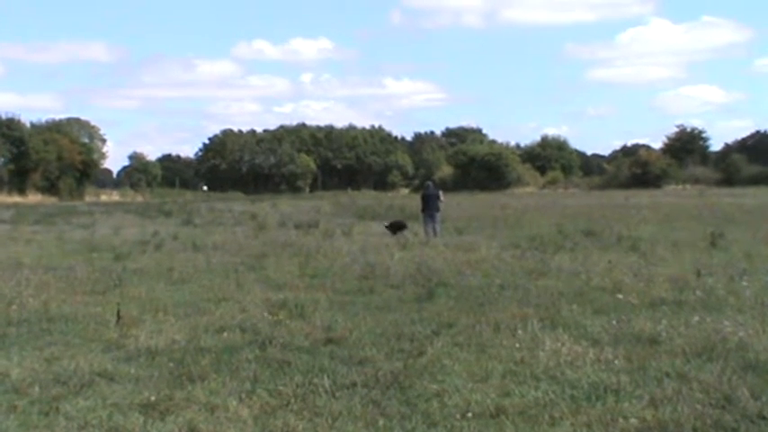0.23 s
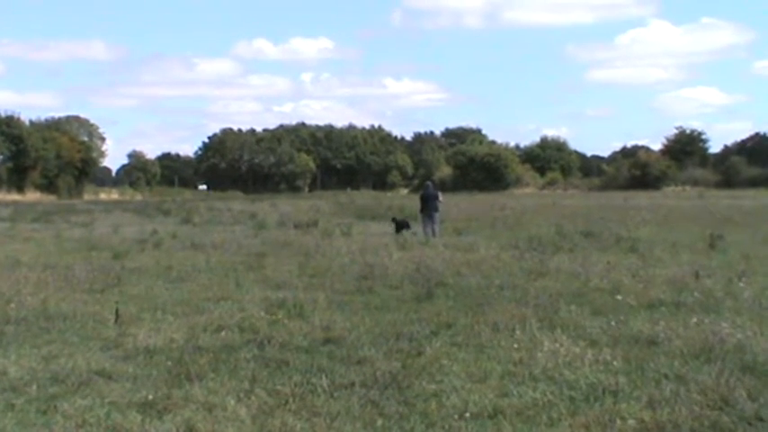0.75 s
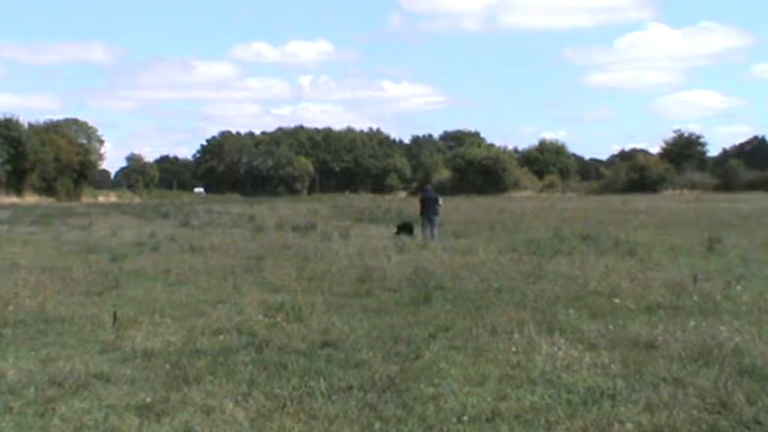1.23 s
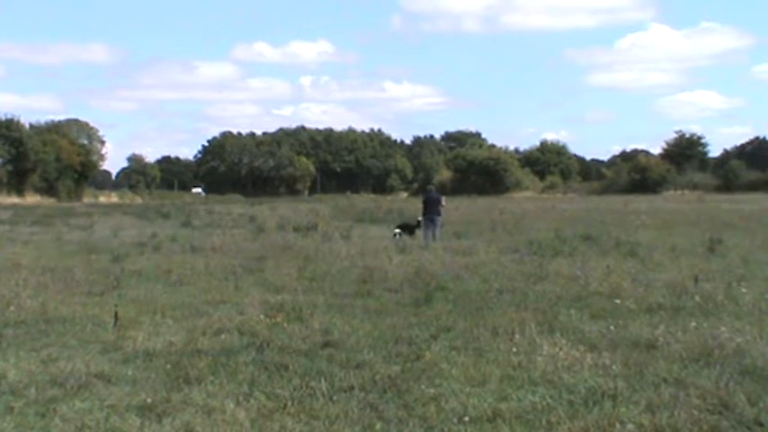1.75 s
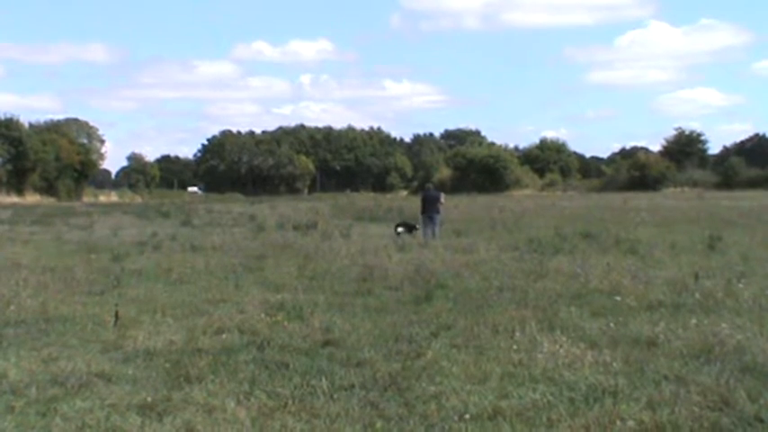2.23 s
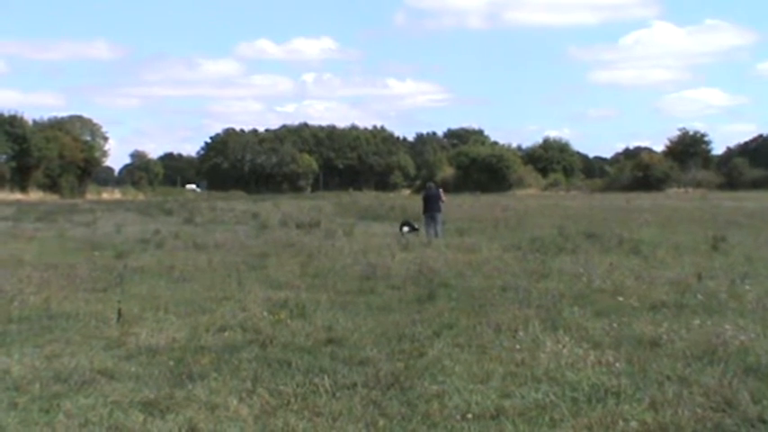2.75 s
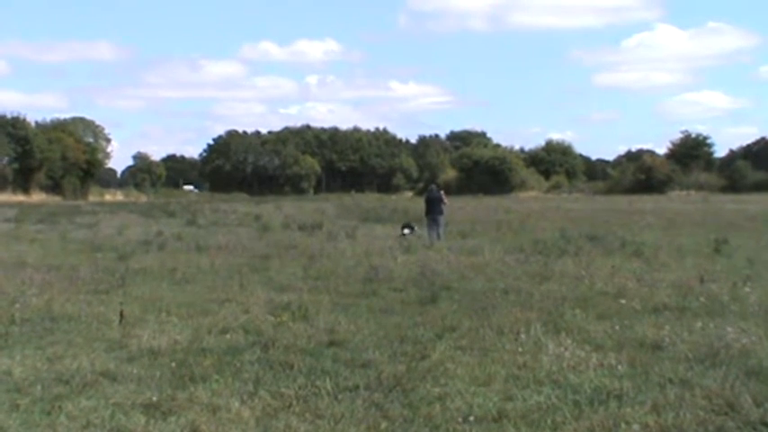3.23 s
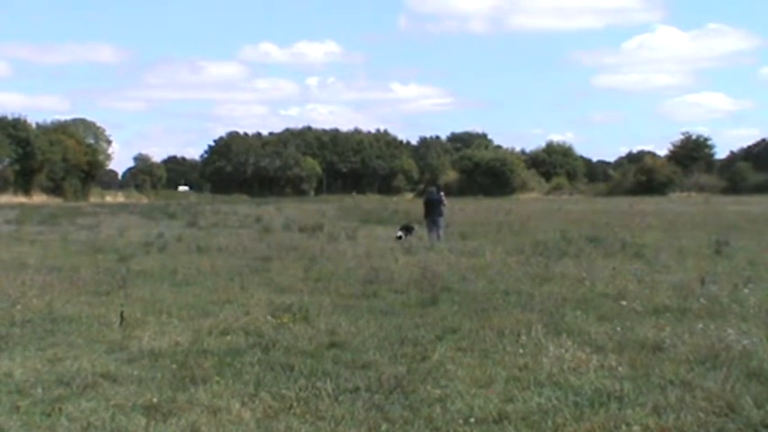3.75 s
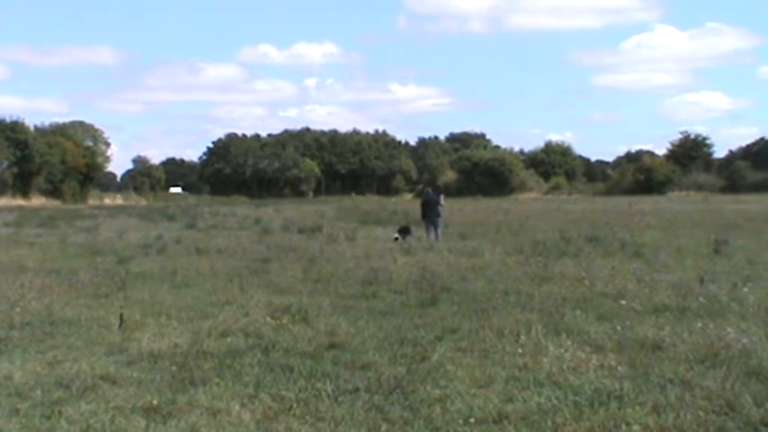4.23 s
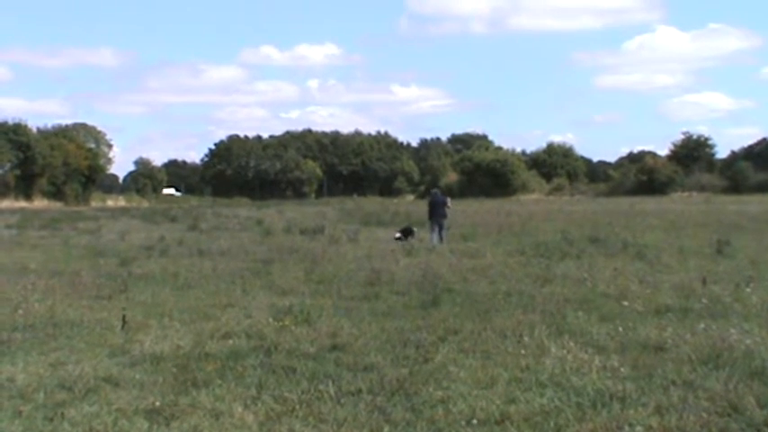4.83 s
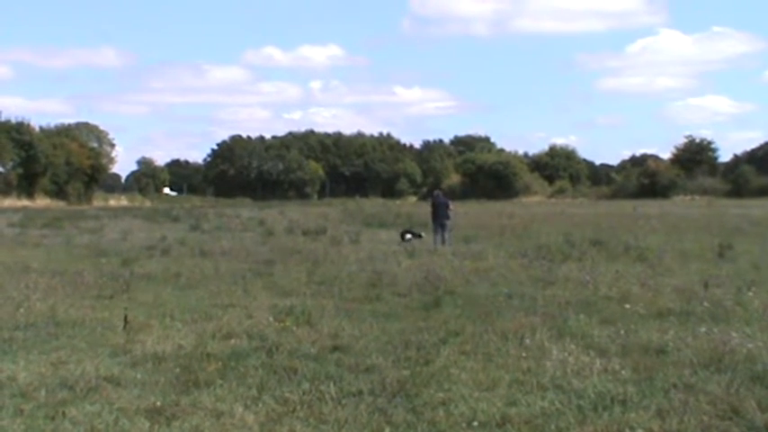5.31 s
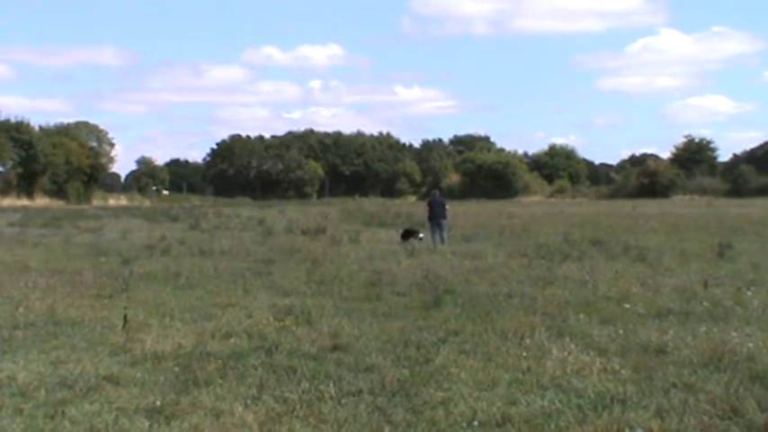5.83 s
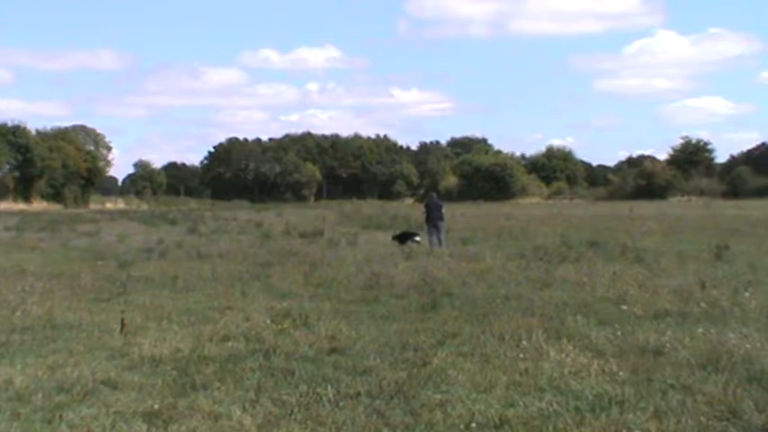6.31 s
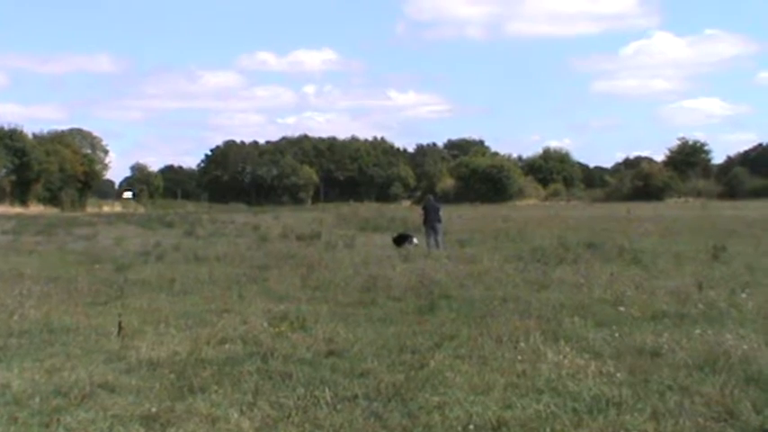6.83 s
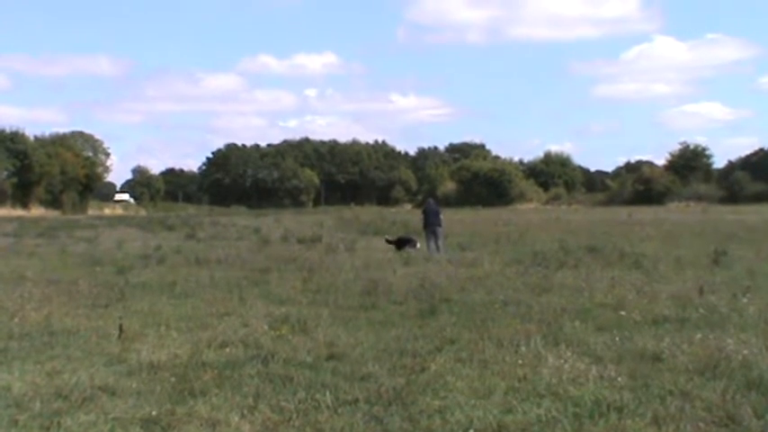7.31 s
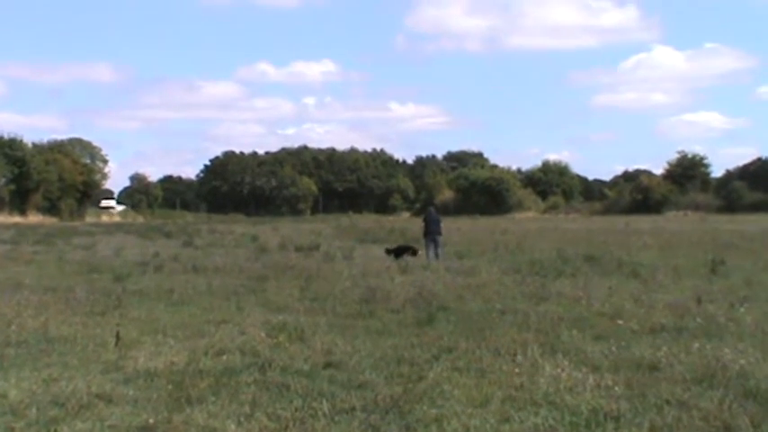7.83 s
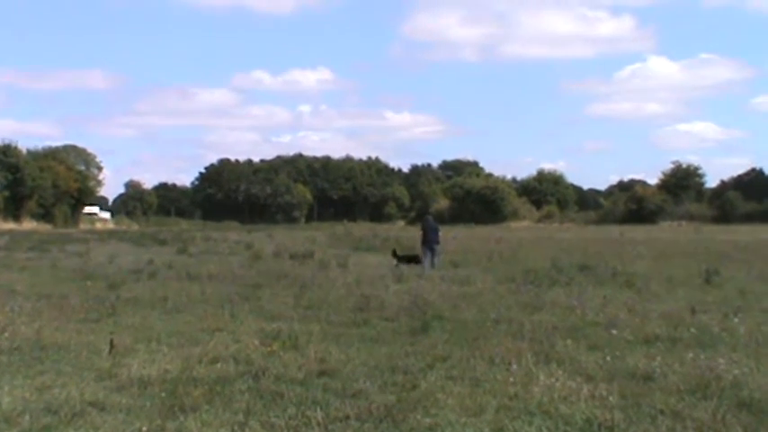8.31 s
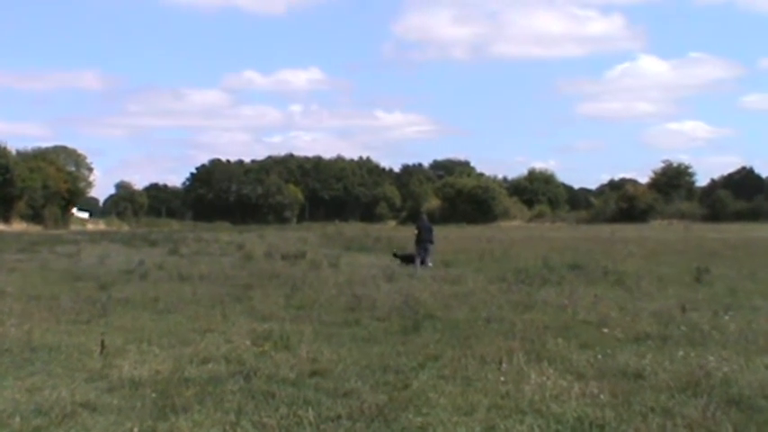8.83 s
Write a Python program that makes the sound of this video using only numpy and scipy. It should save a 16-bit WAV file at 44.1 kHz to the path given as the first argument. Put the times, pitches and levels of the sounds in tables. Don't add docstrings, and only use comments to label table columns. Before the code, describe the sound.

An open meadow heard through an exposed stereo camera microphone. From 0 to about 3.5 s, gusts buffet it: low lumpy rumble with irregular thumps around 100-300 Hz, each touching the left side slightly before the right. Blows thicken from 1 to 1.5 s, peak hard near 2.0-2.2 s with sharper snaps, ease, then one heavy thud comes at 3.2 s. After 4 s only faint puffs remain, with a single distinct bump at 6.2 s. Throughout, a soft far road roar and a fine, shimmering high insect hiss continue, with a barely audible very high electronic whine. From 4.6 to 6.7 s a close grasshopper rasps about seventeen dry ticks per second, swelling; it pauses, then resumes from 7.8 s, growing stronger until the end at 9 s. A very faint, brief distant engine hum passes near 5.8-6.1 s.

```python
import sys
import numpy as np
from scipy import signal
from scipy.io import wavfile
from scipy.ndimage import uniform_filter1d

SR = 44100
rng = np.random.default_rng(int(sys.argv[2]) if len(sys.argv) > 2 else 0)


def transcribe(signal):
    frames = np.atleast_2d(signal).T
    limited = np.clip(frames, -1, 1)
    pcm = np.round(limited * 32767).astype(np.int16)
    wavfile.write(sys.argv[1], SR, pcm)


def ratio_of_db(decibels):
    return 10 ** (np.asarray(decibels, float) / 20)


N = 399546

# (frequency [Hz], level [dB])
LINE_WHINE = [
    (15525, -82),
    (15575, -78),
    (15625, -73),
    (15675, -78),
]
# (start [s], end [s], pitch [Hz], level [dB])
ENGINE_NOTES = [
    (5.757, 5.955, 299.5, -63.5),
    (5.999, 6.124, 289, -60.5),
]

# (time [s], level [dB])
ROAD_LEVEL = [(0, -52.5), (.4, -52.5), (1.05, -49.5), (1.74, -49), (2.44, -52), (3.48, -49.5),
              (4.18, -50.5), (4.88, -51.5), (5.58, -56), (6.27, -52.5), (6.97, -54), (7.67, -54.5),
              (8.71, -52.5), (9.06, -53)]
# (frequency [Hz], density [dB per Hz])
TYRE_COLOUR = [(200, -17), (455, -14), (540, -12), (620, -3), (800, -0.5), (960, -8.5), (1100, -0.5),
               (1280, -3), (1500, -9), (2330, -10.5), (2600, -17.5), (3000, -18), (3500, -25.5),
               (6000, -29)]
# (time [s], spread [s], lorry band [dB], tyre brightness [dB])
VEHICLES = [(0.12, .4, 4, -2.5), (.95, 0.7, -3, -2.5), (1.62, 0.23, -0.5, 4), (2.75, 0.49, 8, 1.8),
            (4.5, 0.39, 5, 1.7), (5.65, 0.37, 0.5, 4), (6.4, 0.34, 1.5, -1), (6.95, 0.5, 4.5, 0.3),
            (8, 0.22, -1.5, 1.5), (8.45, 0.24, 1.5, 0.5), (9.06, 0.14, -2, -3)]
# (time [s], stretch [ratio])
ECHO_STRETCH = [(0, 1.02), (1, 1), (2, 0.99), (3, 1), (3.8, 0.99), (4.5, 0.98), (5.2, 0.98), (5.8, 0.94),
                (6.3, 1.04), (6.9, 1), (7.6, 1.014), (8.3, 1.01), (9.06, 1.02)]
# (frequency [Hz], density [dB per Hz])
WASH_COLOUR = [(150, 3.5), (300, 0.5), (450, 1), (700, -4), (1200, -6), (1800, -10), (2600, -17),
               (4000, -23.5)]
WASH_DB, STREAK_DB = -56.5, 1.2

# (frequency [Hz], left-right likeness [0-1])
AIR_LIKENESS = [(200, 1), (450, 0.12), (700, 1), (1200, 0.87), (2000, 0.76), (4500, 0.31), (8000, 0.33),
                (13000, 0.76)]
# (frequency [Hz], left port leads by [rad])
AIR_PHASE = [(0, -0.081), (1030, 0.73), (5250, -0.047), (6630, 0.64), (9820, -0.33), (10900, -0.0),
             (12600, -0.1), (16500, 0.0)]
# (frequency [Hz], left minus right [dB])
PORT_BALANCE = [(60, -2), (130, 4), (290, 0), (640, 0), (1410, 0.5), (3100, 0), (6820, -1), (15000, -1.5)]

# (time [s], level [dB], share of lower voices [dB])
CHORUS_LEVEL = [(0, -59.5, -3), (.8, -56.5, -6), (1.95, -57.5, -5), (2.9, -57.5, -1.5), (4.3, -59, -4),
                (5.0, -58.5, -4), (5.9, -58.5, -3), (6.6, -57, -3), (7.0, -59.5, -3), (7.85, -58, -2.5),
                (8.5, -56.5, -3), (8.85, -57.5, -2), (9.06, -53, -2)]
# (frequency [Hz], density [dB per Hz])
WING_COLOUR = [(2000, -23), (3500, -5.5), (5000, -7), (7400, -2.5), (13400, 0), (14300, -2.5), (15300, -2)]
# (start [s], end [s], stroke rate [per s], depth [dB])
BUZZ_PHRASES = [(1.6, 1.8, 72, 6), (2.552, 2.78, 84, 5.5), (5.098, 5.302, 62, 2.5), (6.153, 6.33, 62, 4.5)]
# (start [s], end [s], lift [dB])
NEAR_SINGERS = [(.04, 0.162, 3.5), (.24, .32, 1), (.74, .93, 2.5), (1.3, 1.5, 0.5), (1.6, 1.818, 2),
                (2.62, 2.8, 2.5), (2.2, 2.6, 1.5), (3.05, 3.58, 2), (3.9, 4.1, 2), (4.542, 4.75, 2),
                (5.183, 5.554, 2), (6.057, 6.36, 2), (6.4, 6.71, -1), (7.15, 7.43, 2.5), (7.577, 7.72, 2)]
SWELL_S, BREAK_S = 0.13, 0.11

# (time [s], pitch [Hz])
WING_PITCH = [(4.7, 6040), (5.4, 7350), (5.8, 8200), (6.7, 8200), (7.8, 7000), (8.5, 7900), (9.1, 8100)]
# (first [s], last [s], gap [s], first level [dB], last level [dB])
STROKE_RUNS = [(4.639, 4.697, .058, -46, -50), (4.755, 5.285, .0588, -45.5, -42),
               (5.3448, 5.9445, .06, -41.5, -38), (5.9954, 5.9954, .05, -46.5, -41),
               (6.0393, 6.5432, .063, -38.5, -39.5), (6.6031, 6.6599, .057, -38.5, -39.5),
               (7.8002, 8.2288, .0536, -50, -42), (8.2978, 8.7187, .06, -41.5, -37),
               (8.7741, 8.8773, .052, -39, -36.5), (8.9392, 9.048, .054, -38, -37)]
# (time [s], level [dB])
STRAY_STROKES = [(5.757, -47), (8.392, -48), (8.782, -40), (8.958, -40)]
# (delay [s], loss [dB], low edge [share of wing pitch], high edge [share of wing pitch])
LEG_SCRAPES = [(-.0006, -20, 0.93, 1.19), (.0012, -25.5, 0.736, 0.95), (-.0018, -32.5, 0.55, 0.76),
               (-.0005, -25, 1.25, 1.7), (0.0152, -29, 0.66, 0.93), (.031, -32, 0.57, 0.74)]
STROKE_S, RING_S = 0.0015, 0.0095
DRAG_S, DRAG_DB, DRAG_BAND = 0.0464, -23, (0.66, 1.4)

# (start [s], hold [s], buffeting level [dB], eddy fineness as tilt [dB per octave])
GUST_TABLE = [(0.118, 0.034, -38, -6), (0.322, 0.037, -33, 2), (0.474, 0.04, -31.5, 0),
              (0.593, 0.06, -34, -4.5), (0.89, 0.18, -32, 3.5), (1.18, 0.19, -32.5, 6),
              (1.478, 0.25, -33, 3), (1.845, 0.041, -38, 4), (2.018, 0.027, -22, 5), (2.21, 0.045, -34, 3),
              (2.583, 0.16, -33.5, -1.5), (2.748, 0.047, -42, 3), (3.022, 0.17, -47, -11),
              (3.205, 0.026, -25.5, 2.5), (3.283, 0.036, -38.5, 5.5), (3.391, 0.13, -42, 1),
              (3.75, 0.11, -56, -6), (4.023, 0.039, -41, -1.5), (4.238, 0.046, -48.5, -3),
              (4.518, 0.077, -38.5, -9), (6.14, .02, -46, -8), (6.197, 0.047, -46, -4.5),
              (7.644, .06, -53, -4), (8.526, 0.03, -48, -2)]
GUST_RISE_DB_PER_S, GUST_FALL_DB_PER_S, GUST_RISE_S = 404, 158, 0.039
# (time [s], buffeting level [dB])
BREEZE_LEVEL = [(0, -43), (.85, -42), (1.2, -37), (1.95, -37), (2.4, -46), (2.9, -41), (3.7, -45.5),
                (3.96, -54), (4.48, -60), (4.75, -51), (5.1, -53), (5.45, -52), (6, -58.5), (6.4, -56.5),
                (7, -54), (7.9, -56), (8.4, -55), (9.06, -53.5)]
BREEZE_TILT_DB = -0.9
# (frequency [Hz], density [dB per Hz])
BUFFET_COLOUR = [(15, -12), (40, 5.5), (100, 0.5), (200, -9.5), (330, -13.5), (500, -23), (900, -32.5),
                 (1600, -44.5), (4000, -89)]
# (frequency [Hz], left-right likeness [0-1])
BUFFET_LIKENESS = [(30, 1), (70, 1), (200, 0.83), (600, 0.48), (1500, 0.5)]

# (time [s], peak level [dB], pitch set by size [Hz], snap re peak [dB])
SHARP_EDDIES = [(0.369, -21.5, 130, -18), (0.418, -24.5, 236, -16), (0.49, -17.5, 158, -22),
                (1.009, -22, 196, -23), (1.036, -16.5, 235, -26), (1.055, -23, 190, -12),
                (1.08, -26, 330, 0.5), (1.245, -14.5, 212, -16), (1.348, -18, 126, -9.5),
                (1.359, -16, 136, -22), (1.37, -20, 110, -19), (1.492, -20, 166, -19),
                (1.506, -17.5, 169, -20), (1.734, -18, 121, -18), (1.918, -19, 155.6, -22),
                (2.038, -13.5, 230, -29), (2.047, -17.5, 200, -26), (2.061, -13.5, 190, -16),
                (2.073, -19, 138, -7), (2.093, -11.5, 202, -8.5), (2.124, -18, 227, -9),
                (2.176, -14.5, 302, -24), (2.18, -13, 148, -26), (2.25, -23.5, 200, -23),
                (2.301, -22.5, 330, -13), (2.649, -24, 245, -16), (2.694, -25, 171, -18),
                (3.243, -12, 138, -19), (4.078, -30, 120, -20), (6.203, -20, 211, -24)]
# (time [s], peak level [dB], pitch [Hz])
SMOOTH_EDDIES = [(0.053, -29.5, 69.4), (0.13, -27.5, 193), (0.285, -24.5, 118), (0.383, -24, 116),
                 (0.402, -23.5, 100), (0.539, -23, 99), (0.55, -20, 90), (0.903, -21.5, 136),
                 (0.915, -22.5, 167), (1.338, -16, 203), (1.407, -25, 170), (1.453, -23, 170),
                 (1.521, -23.5, 100), (1.618, -22, 142), (1.968, -21, 118), (2.263, -16, 101),
                 (2.29, -20.5, 169), (2.357, -27, 214), (2.662, -22, 101), (2.783, -23.5, 169),
                 (2.917, -24, 100), (3.227, -26, 140), (3.284, -18.5, 110), (3.327, -24.5, 170),
                 (4.576, -27, 143), (4.614, -24.5, 113), (4.632, -28, 101), (6.307, -27.5, 106),
                 (1.797, -26, 201.6), (3.262, -21, 189)]
# (time [s], peak level [dB])
SIZED_EDDIES = [(4.248, -32.5), (4.779, -34), (5.369, -34.5), (6.239, -30), (7.26, -39), (7.65, -41),
                (8.02, -35.5), (8.848, -35.5), (9.7, -37), (6.33, -41), (3.252, -27), (.625, -27.5),
                (0.724, -28), (0.824, -28), (2.5, -32), (2.168, -19), (2.985, -29), (3.62, -38)]
# (time [s], peak level [dB], pitch [Hz])
INNER_EDDIES = [(0.015, -38, 90), (0.346, -28, 117), (0.443, -40, 103), (0.477, -27.4, 172),
                (0.592, -35, 80), (0.699, -35, 90), (0.935, -31, 222), (0.951, -34, 90), (0.972, -31, 90),
                (1.134, -38, 103), (1.149, -32, 151), (1.163, -32, 253), (1.174, -30, 195),
                (1.19, -31, 172), (1.201, -36, 171), (1.226, -34, 222), (1.258, -26.5, 327),
                (1.266, -28, 151), (1.299, -28, 371), (1.323, -28.9, 287), (1.429, -36, 422),
                (1.44, -30, 222), (1.469, -32, 133), (1.538, -26.5, 133), (1.574, -27.5, 195),
                (1.634, -32, 220), (1.656, -24.5, 200), (1.69, -28, 172), (1.705, -28, 222),
                (1.755, -28, 117), (1.779, -35, 90), (1.854, -33.5, 117), (2.107, -24, 172),
                (2.145, -29.7, 172), (2.156, -27, 195), (2.217, -33, 195), (2.324, -27, 117),
                (2.606, -31.5, 150), (2.631, -27.5, 133), (2.737, -29.5, 220), (2.763, -31.2, 172),
                (2.802, -29, 195), (2.818, -39, 172), (2.829, -26.5, 195), (2.868, -39, 117),
                (2.999, -36, 103), (3.032, -39, 91), (3.086, -32, 70), (3.104, -33, 133), (3.171, -35, 151),
                (3.207, -33, 103), (3.3, -24, 151), (3.366, -37, 117), (3.378, -32, 151),
                (3.414, -28.5, 133), (3.533, -33, 103), (3.556, -32, 150), (3.64, -34, 80),
                (4.653, -35, 80)]
# (time [s], peak level [dB], pitch [Hz])
FURTHER_EDDIES = [(1.084, -24, 120), (1.302, -35, 100), (2.443, -37.5, 90), (3.518, -31, 110),
                  (3.728, -38, 90), (3.76, -39, 90), (3.787, -40, 90), (4.163, -42, 90), (4.216, -45, 90),
                  (4.282, -38, 100), (4.56, -38, 170), (4.73, -36, 90), (4.795, -38, 120), (4.85, -45, 80),
                  (4.873, -50, 90), (4.9, -48, 90), (4.93, -47, 80), (6.28, -41, 90), (6.421, -42, 80),
                  (6.462, -43, 90), (6.767, -43, 90), (8.365, -41, 90), (8.57, -43, 90), (9.039, -43, 90),
                  (0.561, -30, 240), (1.02, -34, 240), (1.511, -25.5, 240), (2.053, -22, 200),
                  (2.666, -27, 260), (2.675, -31, 260), (3.272, -27, 190), (8.931, -40, 240),
                  (3.348, -30, 120), (2.902, -32, 110), (2.84, -36, 150), (0.552, -37, 240), (1.064, -26, 230),
                  (1.197, -31, 240), (1.602, -31, 100), (2.066, -23, 200), (2.195, -31, 150),
                  (2.206, -32, 170), (2.23, -31, 150), (3.464, -34, 100), (3.706, -37, 90), (8.666, -44, 90),
                  (2.338, -28, 130)]
# (time [s], peak level [dB], pitch [Hz])
TORN_EDDIES = [(0.620, -33, 330), (0.870, -37, 580), (1.031, -29, 520), (1.049, -36, 480),
               (1.061, -32, 480), (1.080, -28, 1000), (1.237, -32, 800), (1.240, -35, 480),
               (1.252, -33, 480), (1.266, -36, 480), (1.271, -36, 480), (1.298, -35, 480),
               (1.349, -26, 1000), (1.376, -35, 450), (1.432, -37, 480), (1.500, -37, 480),
               (1.513, -30, 340), (1.713, -36, 480), (1.800, -39, 540), (1.852, -36, 1100),
               (2.036, -30, 420), (2.059, -34, 1400), (2.060, -27, 480), (2.068, -32, 500),
               (2.068, -37, 1600), (2.085, -31, 480), (2.091, -29, 1050), (2.099, -31, 650),
               (2.110, -31, 650), (2.123, -27, 950), (2.127, -33, 590), (2.165, -34, 480),
               (2.179, -20, 420), (2.258, -33, 480), (2.316, -29, 420), (2.649, -35, 480),
               (3.246, -33, 800), (3.337, -30, 300), (6.201, -31, 430)]
ROUND_SNAP_DB, SIZED_HZ, INNER_LIFT_DB = -35, 90.5, 1
STEEP_FRONT = 0.21
PUSH_TURNS, PUSH_SPREAD = 0.094, 0.53
LATE_TURNS = 0.25


def evened(x):
    return x / np.sqrt(np.mean(x ** 2) + 1e-20)


def read(points, hz):
    f, value = np.transpose(points)
    return np.interp(np.log(hz + 1), np.log(f + 1), value)


def follow(rows, t):
    s, *columns = np.transpose(rows)
    return [np.interp(t, s, c) for c in columns]


def add(mix, s, sound):
    part = mix[max(round(s * SR), 0):][:len(sound)]
    part += sound[:len(part)]


def frame_grid(size):
    return np.arange(4 * N // size + 5) * size / 4 / SR, np.fft.rfftfreq(size, 1 / SR)[:, None]


def noise_pair(size, level_db, colour_db, same, lead, balance_db, patch_db):
    a, b, c, d, patches = rng.standard_normal((colour_db.shape[1], size // 2 + 1, 5)).T
    patches = uniform_filter1d(patches, size=5, axis=0)
    patches = evened(uniform_filter1d(patches, size=9, axis=1))
    shape = ratio_of_db(colour_db) / np.sqrt(np.mean(ratio_of_db(colour_db) ** 2, axis=0))
    same = np.clip(same, 0, 1)
    left = a + 1j * b
    right = (same * left + np.sqrt(1 - same ** 2) * (c + 1j * d)) * np.exp(-1j * lead)
    z = np.array([left * ratio_of_db(balance_db / 2), right * ratio_of_db(-balance_db / 2)]) * shape
    overlap = 3 * size // 4
    unit = np.sqrt(np.mean(signal.istft(z[..., ::4], nperseg=size, noverlap=overlap)[1] ** 2))
    sound = signal.istft(z * ratio_of_db(level_db + patch_db * patches), nperseg=size, noverlap=overlap)[1]
    return sound[:, :N] / unit


def lumps(per_s):
    knots = np.arange(0, N + SR, SR / per_s)
    slow = np.interp(np.arange(N), knots, rng.standard_normal(len(knots)))
    return evened(uniform_filter1d(slow, size=200))


def whine():
    t = np.arange(N) / SR
    return sum(ratio_of_db(db + 3) * np.sin(2 * np.pi * (hz * t + rng.random())) for hz, db in LINE_WHINE)


def drone():
    out = np.zeros(N)
    for a, b, hz, db in ENGINE_NOTES:
        t = np.arange(0, b - a, 1 / SR)
        fade = np.sin(np.pi * t / (b - a)) ** 0.41
        add(out, a, ratio_of_db(db + 3) * fade * np.sin(2 * np.pi * hz * (t - 0.094 * t ** 2)))
    return out


def road():
    t, hz = frame_grid(size=2048)
    lorry_db, bright_db = sum(np.outer(db, np.exp(-((t - s) / spread) ** 2))
                              for s, spread, *db in VEHICLES)
    lorry_db = lorry_db - lorry_db.mean()
    bright_db = bright_db - bright_db.mean()
    colour_db = read(TYRE_COLOUR, hz / follow(ECHO_STRETCH, t)[0])
    colour_db = colour_db + bright_db * np.clip((hz - 1300) / 1200, 0, 1.3)
    colour_db += lorry_db * np.exp(-((hz - 760) / 170) ** 2)
    level_db = follow(ROAD_LEVEL, t)[0] + 4.0 + 0.23 * lorry_db
    streaks = uniform_filter1d(rng.standard_normal(colour_db.shape[::-1]), size=30, axis=0)
    colour_db += STREAK_DB * evened(uniform_filter1d(streaks, size=2, axis=1)).T
    near, far = ratio_of_db(2 * colour_db), ratio_of_db(2 * read(WASH_COLOUR, hz))
    power = near / near.mean(0) * ratio_of_db(2 * level_db) + far / far.mean(0) * ratio_of_db(2 * WASH_DB)
    return noise_pair(2048, 10 * np.log10(power.mean(0)), 10 * np.log10(power), read(AIR_LIKENESS, hz),
                      read(AIR_PHASE, hz), read(PORT_BALANCE, hz), patch_db=0.63)


def wing_strokes(turns, sharp):
    pulse = np.exp(sharp * np.cos(2 * np.pi * turns))
    return (pulse - pulse.mean()) / pulse.std()


def chorus():
    t, hz = frame_grid(size=256)
    level_db, low_db = follow(CHORUS_LEVEL, t)
    for a, b, db in NEAR_SINGERS:
        level_db += db * np.clip(np.minimum((t - a) / SWELL_S, (b - t) / BREAK_S) + .5, 0, 1)
    low = np.clip((10500 - hz) / 1500, 0, 1) * np.clip((hz - 4500) / 2000, 0, 1)
    far = np.clip((6500 - hz) / 2000, 0, 1)
    trill_db = 2.1 * wing_strokes(115.65 * t, 3.5) * np.exp(-((hz - 13500) / 2500) ** 2)
    throb_db = 0.97 * lumps(per_s=130)[np.minimum(t * SR, N - 1).astype(int)]
    buzz_db = sum(db / 2 * wing_strokes(rate * t, 1.2) * (t > a) * (t < b)
                  for a, b, rate, db in BUZZ_PHRASES)
    colour_db = read(WING_COLOUR, hz) + (low_db - low_db.mean()) * low - far * (level_db - level_db.mean())
    moving_db = level_db + 4.5 + trill_db + throb_db * (1 - far)
    moving_db = moving_db + buzz_db * np.clip((hz - 8000) / 3000, 0, 1)
    return noise_pair(256, moving_db, colour_db, read(AIR_LIKENESS, hz),
                      read(AIR_PHASE, hz), read(PORT_BALANCE, hz), patch_db=1.24)


def leg_strokes():
    runs = [np.linspace([a, db_a], [b, db_b], round((b - a) / gap) + 1)
            for a, b, gap, db_a, db_b in STROKE_RUNS]
    return np.concatenate([*runs, STRAY_STROKES])


def grasshopper():
    out, t = np.zeros((2, N)), np.arange(2400) / SR
    ticks = leg_strokes()
    pitch = follow(WING_PITCH, ticks[:, 0])[0]
    stroke = (t / STROKE_S) * np.exp(1 - t / STROKE_S)
    stroke += 0.48 * (1 - np.exp(-t / STROKE_S)) * np.exp(-t / RING_S)
    drag = np.clip(np.minimum(t, DRAG_S - t) / .003, 0, 1)
    parts = [*[(*row, stroke[:900]) for row in LEG_SCRAPES], (0, DRAG_DB, *DRAG_BAND, drag)]
    noise = rng.standard_normal((len(pitch), len(parts), 2, 2400))
    for (s, db), hz, scrapes in zip(ticks, pitch, noise):
        for (after, loss_db, low, high, shape), scrape in zip(parts, scrapes):
            band = signal.butter(3, [low * hz, high * hz], "band", fs=SR)
            near, echo = evened(signal.lfilter(*band, scrape[:, :len(shape)]) * shape)
            add(out[0], s + after, ratio_of_db(db + loss_db - 6.5) * (near + 0.2 * echo) * 2)
            add(out[1], s + after, ratio_of_db(db + loss_db - 3.5) * near * 2)
    return out


def wind(t):
    start, hold, db, tilt = np.transpose(GUST_TABLE)[:, :, None]
    since = t - start - GUST_RISE_S
    rise_db = GUST_RISE_DB_PER_S * np.minimum(since, 0)
    fall_db = GUST_FALL_DB_PER_S * np.maximum(since - hold, 0)
    gusts = ratio_of_db(2 * (db + rise_db - fall_db))
    breeze = ratio_of_db(2 * follow(BREEZE_LEVEL, t)[0])
    power = breeze + gusts.sum(0)
    return 10 * np.log10(power), (BREEZE_TILT_DB * breeze + (tilt * gusts).sum(0)) / power


def buffeting():
    t, hz = frame_grid(size=2048)
    _, tilt = wind(t)
    colour_db = read(BUFFET_COLOUR, hz) + tilt * np.log2(np.clip(hz, 50, 1500) / 90)
    lead = 2 * np.pi * hz * 0.00072
    rumble = noise_pair(2048, 0, colour_db, read(BUFFET_LIKENESS, hz), lead, -0.4, patch_db=1.5)
    level_db = np.repeat(wind(np.arange(N // 64 + 1) * 64 / SR)[0], 64)[:N]
    level_db = uniform_filter1d(level_db, size=64)
    lumpy_db = np.clip(0.07 * (level_db + 63.0), .4, 2.4)
    eased_db = level_db + 1.73 - 0.32 * np.maximum(level_db + 51.5, 0)
    return rumble * ratio_of_db(eased_db + lumpy_db * lumps(per_s=66))


def eddies():
    out, t = np.zeros((2, N)), np.arange(-1500, 1500) / SR
    smooth = [*SMOOTH_EDDIES, *[(*row, SIZED_HZ) for row in SIZED_EDDIES],
              *[(s, db + INNER_LIFT_DB, hz) for s, db, hz in INNER_EDDIES], *FURTHER_EDDIES, *TORN_EDDIES]
    rows = [*SHARP_EDDIES, *[(*row, ROUND_SNAP_DB) for row in smooth]]
    for (s, db, hz, snap_db), (turn, swirl, *wobble) in zip(rows, rng.random((len(rows), 6))):
        late = min(0.00071 + 0.054 / hz, LATE_TURNS / hz)
        push = PUSH_TURNS + PUSH_SPREAD * (turn - .5)
        for port in (0, 1):
            size = 1 + 0.5 * (wobble[port] - .5)
            twist = 0.17 * (wobble[2 + port] - .5)
            u = (t - (port - .5) * late) * hz * size
            u = u * (1 - STEEP_FRONT * np.tanh(2 * u))
            swing = np.exp(-abs(u / 0.49) ** 1.62) * np.cos(2 * np.pi * (u + push + twist))
            around = np.exp(-u ** 2)
            swing -= 0.47 * swing.sum() * around / around.sum()
            edge = (t - (port - .5) * 0.00046) * 620 * size
            snap = np.exp(-abs(edge / 0.44) ** 1.25) * np.cos(2 * np.pi * (edge + swirl + twist))
            level = ratio_of_db(db + 1.0 + (port + 0.5) * 0.81)
            add(out[port], s - 1500 / SR, level * (swing + ratio_of_db(snap_db + 6.5) * snap))
    return out


def scene():
    return whine() + drone() + road() + chorus() + grasshopper() + buffeting() + eddies()


def top_cut(x):
    return signal.sosfilt(signal.butter(12, 16930, fs=SR, output="sos"), x)


def record(dry):
    cut = signal.lfilter(*signal.butter(1, 25, "high", fs=SR), dry)
    edge = signal.firwin(1501, 15760, window=("kaiser", 9), fs=SR)
    return top_cut(signal.oaconvolve(cut, edge[None], "same"))


dry = scene()
out = record(dry)
transcribe(out)
```